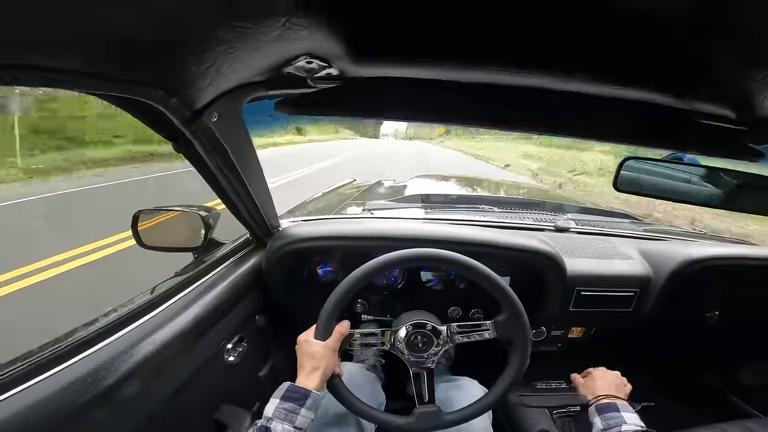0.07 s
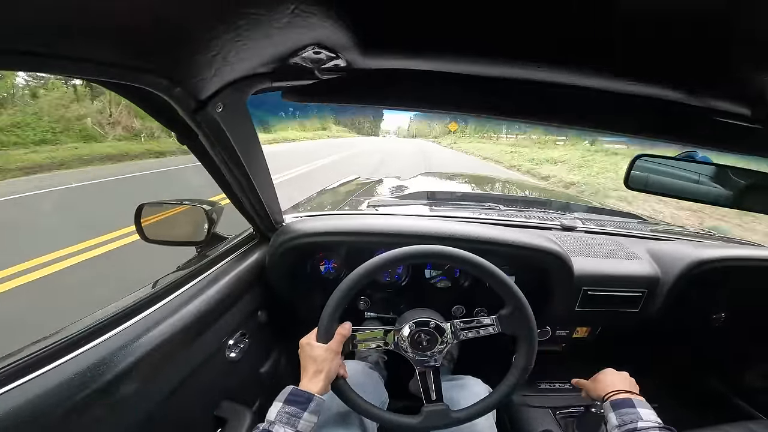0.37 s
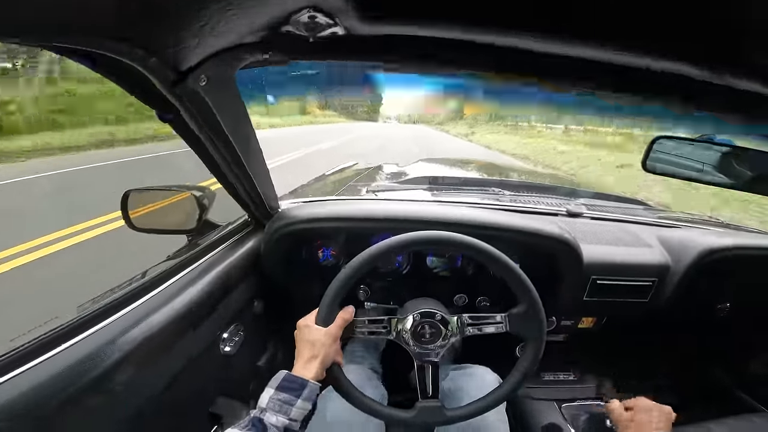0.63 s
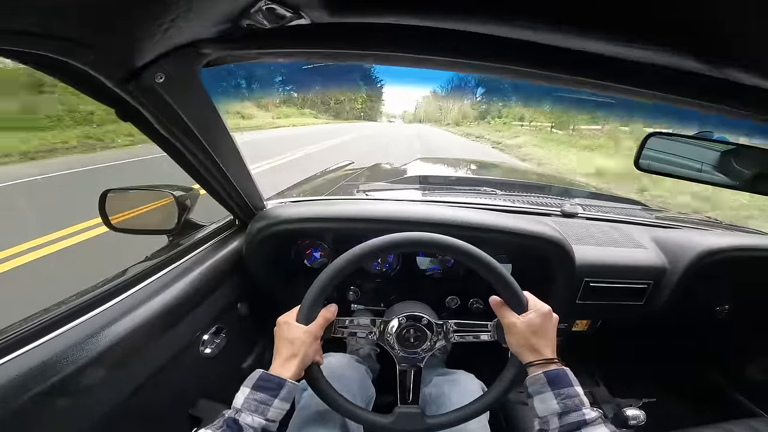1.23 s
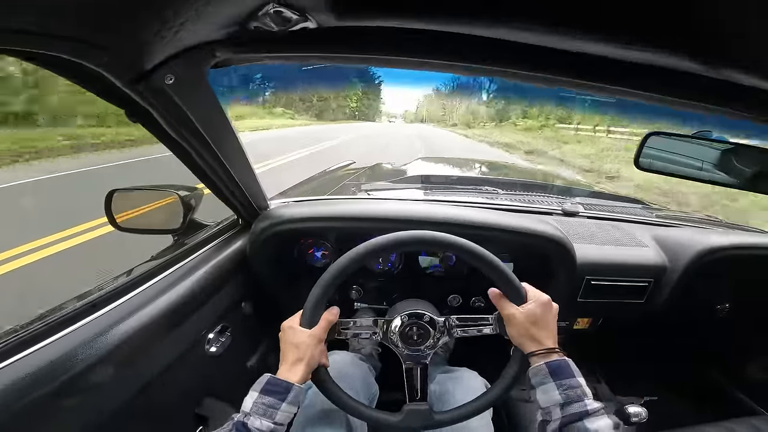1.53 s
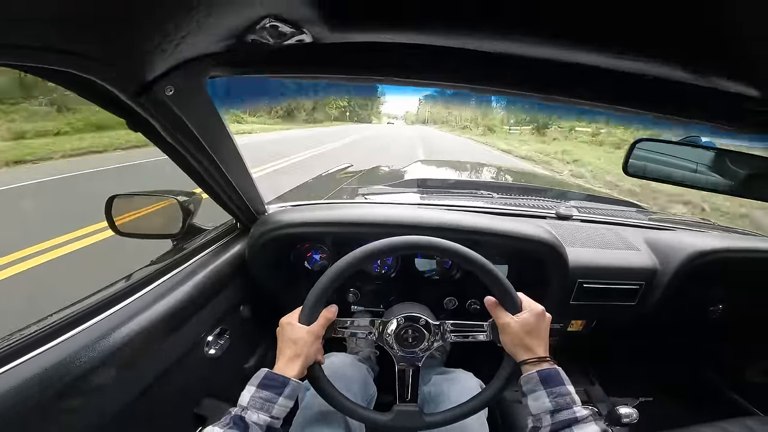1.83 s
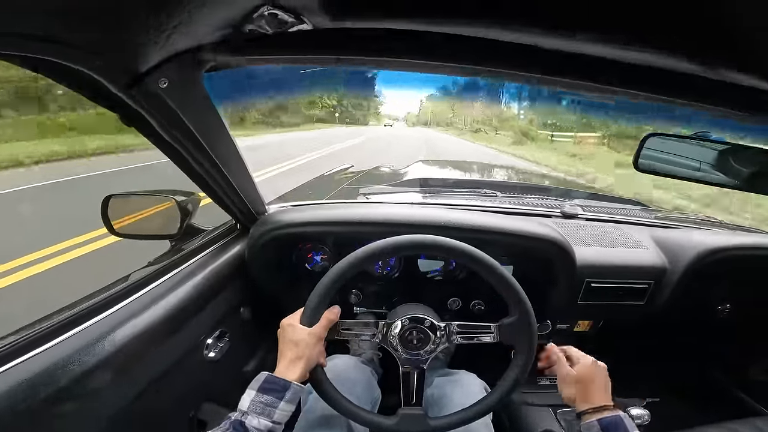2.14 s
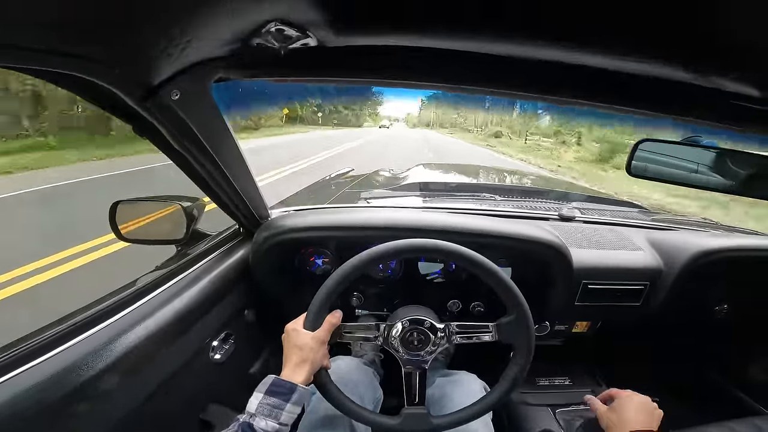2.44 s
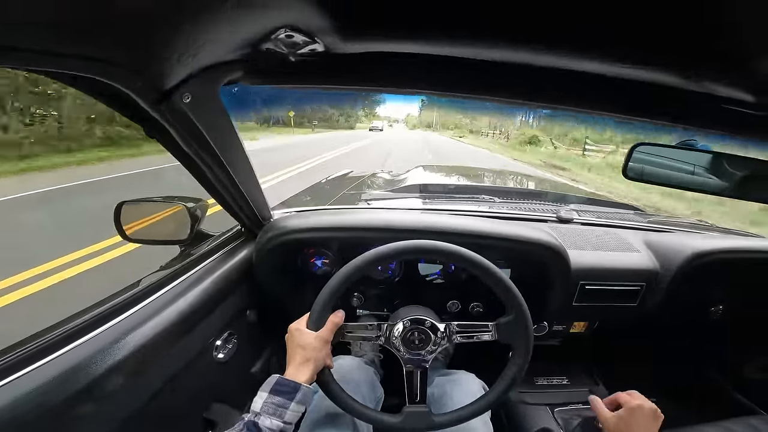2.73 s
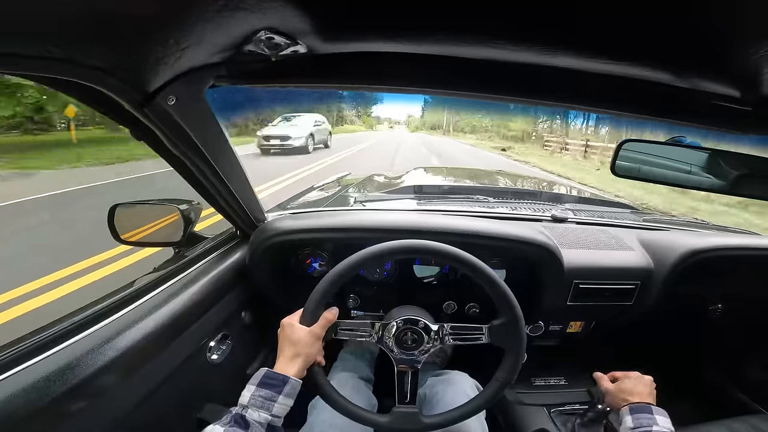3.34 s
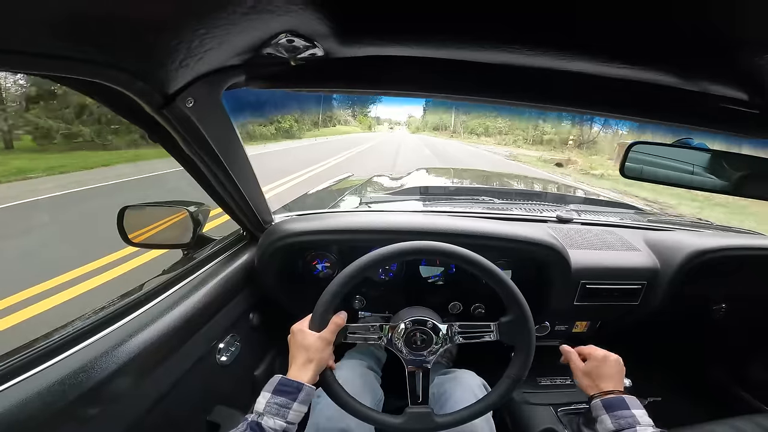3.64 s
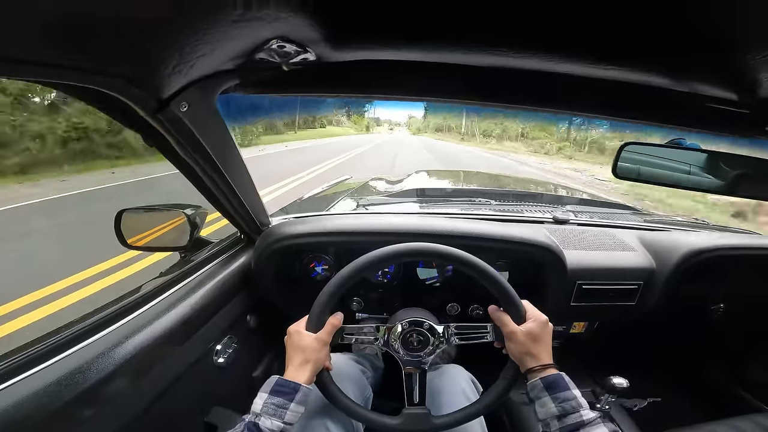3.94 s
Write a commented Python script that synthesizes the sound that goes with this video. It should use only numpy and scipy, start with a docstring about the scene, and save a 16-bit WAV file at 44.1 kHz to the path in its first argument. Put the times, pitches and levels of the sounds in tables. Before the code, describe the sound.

Loud car engine from the cabin, accelerating, shifting, then easing off over road rumble.

```python
"""Inside an old V8 coupe on an open road. The engine roars at full throttle, drops through a gear change,
pulls again, settles to a cruise and finally runs down off the throttle, setting the cabin booming.
Its note is a stack of orders, multiples of the four-stroke cycle rate, fluttering with uneven combustion;
the firings puff out rasp and hiss and shake pipes and metal. A few short bright clacks cut through.
Tyres rumble, wind hisses and the drive line whines underneath; an oncoming car brushes past."""
import sys
import numpy as np
from scipy import signal
from scipy.fft import rfft, irfft
from scipy.io import wavfile

SR = 44100
rng = np.random.default_rng(int(sys.argv[2]) if len(sys.argv) > 2 else 0)


def log_audio(samples):
    """Write samples as a 16-bit WAV file to the path given in sys.argv[1]."""
    # one column per channel
    frames = np.atleast_2d(samples).T
    # limit to full scale, then quantise
    limited = np.clip(frames, -1, 1)
    pcm = np.round(limited * 32767).astype(np.int16)
    wavfile.write(sys.argv[1], SR, pcm)


N = 176400
TIME = np.arange(N) / SR

# Fader for the full-throttle roar and growl. Each row: time in seconds, level in dB.
ROAR_FADER = [(0, -19.5), (.2, -20.5), (.43, -18), (.5, -24), (.56, -33), (.63, -66)]
# Fader for the mechanical singing and the thin tone beside it. Each row: time in seconds, level in dB.
SINGING_FADER = [(1.1, -46), (1.3, -36), (1.7, -38.5), (2.2, -37), (3.101, -37.5), (3.4, -41)]


def from_db(db):
    """Decibels to gain."""
    return 10 ** (np.asarray(db) / 20)


def rms_one(x):
    """Scale to unit power."""
    return x / np.sqrt(np.mean(x ** 2) + 1e-20)


def in_time(rows):
    """A control curve at every sample."""
    return np.interp(TIME, *np.transpose(rows))


def at_hz(points, hz):
    """Read a spectrum on a log-frequency axis."""
    f, db = np.transpose(points)
    return np.interp(np.log(hz + 1e-3), np.log(f), db)


def drift(rate_hz):
    """Slow random motion of spread 1."""
    hop, warm_up = 40, 2000
    r = np.exp(-2 * np.pi * hop * rate_hz / SR)
    white = rng.standard_normal(N // hop + warm_up + 2)
    slow = signal.lfilter([1], [1, -2 * r, r * r], white)[warm_up:]
    return np.interp(np.arange(N) / hop, np.arange(len(slow)), rms_one(slow))


def coloured(x, colour):
    """Give a steady sound a spectrum; unit power."""
    hz = np.arange(N // 2 + 1) * SR / N
    return rms_one(irfft(rfft(x) * from_db(at_hz(colour, hz)), N))


def noise(colour):
    """Steady noise with a spectrum."""
    return coloured(rng.standard_normal(N), colour)


def tyres():
    """Tyres rolling on the road lay down a bed of rumble."""
    # Swell of the rumble. Each row: time in seconds, level in dB.
    fader = [(0, -23), (.6, -20), (1.1, -23), (1.8, -22.5), (2.4, -22.5), (3.2, -20), (4, -23)]
    # Its dark tone. Each row: frequency in Hz, relative level in dB.
    colour = [(20, -12), (35, -9), (60, -3), (85, -7), (115, 1), (160, 8.5), (210, 2), (400, 1.5),
              (600, -4), (850, -12), (1200, -21.5), (2500, -65.5)]
    return from_db(in_time(fader)) * noise(colour)


def wind():
    """Air rushes round the windows, wavering slightly."""
    # Tone of the rush. Each row: frequency in Hz, relative level in dB.
    colour = [(500, -0.5), (900, 2.5), (1300, 1.5), (1800, -1), (2600, -5), (3400, -10), (4700, -9),
              (6000, -16.5), (7700, -24), (9000, -39.5), (10800, -31), (12200, -34.5), (14000, -42.5)]
    return from_db(-33 + 1.2 * drift(9.2)) * noise(colour)


def driveline_whine(hz=558.6):
    """The drive line holds one wavering pitch, loudest at the cruise."""
    # Swell of the whine. Each row: time in seconds, relative level in dB.
    fader = [(0, -10), (1.2, -2.5), (1.4, -11.5), (1.94, -10), (2.08, 4), (2.62, 5.5), (3, -6), (4, -7.5)]
    level = from_db(-28 + in_time(fader) + drift(11))
    return level * np.sqrt(2) * np.sin(2 * np.pi * hz * TIME + 0.71 * drift(6.4))


def oncoming_car(nearest_s=3.33, half_width_s=0.13):
    """A swish swells and fades as the other car goes by."""
    # Tone of the swish. Each row: frequency in Hz, relative level in dB.
    colour = [(400, -0.5), (1200, 1.5), (2500, -2), (4500, -1.5), (7500, -16.5), (11000, -40)]
    swell = from_db(-35.5) / (1 + ((TIME - nearest_s) / half_width_s) ** 2)
    return swell * noise(colour)


def thin_tone(hz=1159):
    """A faint high tone swells with the mechanical singing."""
    level = from_db(in_time(SINGING_FADER) - 4)
    return level * np.sqrt(2) * np.sin(2 * np.pi * hz * TIME + drift(4))


def clacks(decay_s=0.0059):
    """Short bright clacks: rattles under load, a crack as the throttle lifts, a clack at the gear change."""
    # The hits. Each row: start in seconds, peak level in dB.
    hits = [(.383, -31), (.497, -30), (.621, -33), (1.481, -35), (1.618, -35), (1.654, -30)]
    # Their bright tone. Each row: frequency in Hz, relative level in dB.
    colour = [(600, -20), (2800, 4), (11000, -17.5), (15000, -28)]
    envelope = sum(from_db(db) * (TIME > s) * np.exp(-np.abs(TIME - s) / decay_s) for s, db in hits)
    return envelope * noise(colour)


def firing_puffs(cycles, depth=0.2, uneven_db=1.5):
    """An envelope with one puff of gas per firing, each cylinder with its own strength."""
    # Punch of the cylinders in firing order. Each entry: relative level in dB.
    cylinders_db = [2, -2, 1, -3, 2, -1, -3, 0]
    firings = len(cylinders_db) * cycles
    cylinder = firings.astype(int) % len(cylinders_db)
    strength = from_db(np.array(cylinders_db)[cylinder] + uneven_db * drift(90))
    return rms_one(1 - depth + 2 * depth * strength * np.sin(np.pi * firings) ** 2)


def resonance(cycles, hz, width_hz):
    """The firings shake a narrow resonance; unit power."""
    r = np.exp(-np.pi * width_hz / SR)
    shake = rng.standard_normal(N) * firing_puffs(cycles)
    return rms_one(signal.lfilter([1, 0, -1], [1, -2 * r * np.cos(2 * np.pi * hz / SR), r * r], shake))


def intake_hiss(cycles):
    """The intake hisses under load, pulsing with the firings."""
    # Swell of the hiss. Each row: time in seconds, level in dB.
    fader = [(0, -36.5), (.25, -37.5), (.44, -36), (.53, -57), (.63, -52), (.8, -68), (1.2, -71.5),
             (1.45, -46.5), (1.65, -51.5), (1.9, -67)]
    # Its airy tone. Each row: frequency in Hz, relative level in dB.
    colour = [(3000, 1.5), (6000, 5), (8000, 5.5), (10300, 5), (12500, -4), (15500, -8.5)]
    return from_db(in_time(fader) + drift(26)) * noise(colour) * firing_puffs(cycles)


def bonnet_ring(cycles):
    """Metal under the bonnet rings at full throttle."""
    # Swell of the ring. Each row: time in seconds, level in dB.
    fader = [(0, -40), (.24, -26), (.48, -36), (.56, -56), (1.5, -46), (2.1, -54)]
    return from_db(in_time(fader)) * resonance(cycles, hz=2135, width_hz=36)


def pipe_growl(cycles):
    """The pipes resonate along with the roar."""
    # Pipe resonances. Each row: frequency in Hz, width in Hz, offset from the roar fader in dB.
    pipes = [(375, 21, -12.5), (704, 32, -9.5)]
    roar_db = in_time(ROAR_FADER)
    return sum(from_db(roar_db + db) * resonance(cycles, hz, width) for hz, width, db in pipes)


def rasp(cycles, points_per_cycle=300, clatter_band_hz=(930, 3950)):
    """Mechanical clatter that repeats every cycle, with noise puffed out by the firings."""
    # Swell of the rasp. Each row: time in seconds, level in dB.
    fader = [(0, -20), (.25, -18.5), (.46, -20), (.51, -27.5), (.8, -38), (1.1, -54), (1.3, -33.5),
             (1.48, -27), (1.75, -32.5), (2, -35.5), (3.15, -36.5), (3.5, -36), (4, -48)]
    # Its midrange bite. Each row: frequency in Hz, relative level in dB.
    colour = [(500, -11.5), (720, 10.5), (900, 2), (1130, 2.5), (1450, 1), (1950, -6), (2150, -3),
              (2500, -2), (2900, -4), (3300, -9), (3850, -5), (6000, -13.5), (9000, -30), (15000, -44)]
    pattern = signal.resample(rng.standard_normal(points_per_cycle), 8 * points_per_cycle)
    looped = np.interp(cycles, np.arange(len(pattern)) / len(pattern), pattern, period=1)
    band = signal.butter(4, clatter_band_hz, "band", fs=SR, output="sos")
    clatter = signal.sosfilt(band, coloured(looped, colour))
    puffs = coloured(rng.standard_normal(N) * firing_puffs(cycles), colour)
    return from_db(in_time(fader)) * (from_db(-1) * clatter + from_db(-3) * puffs)


def engine_orders(cycles, count):
    """For each multiple of the cycle rate, a clean line and a fluttering one from uneven combustion."""
    clean, ragged = [], []
    for k in range(1, count + 1):
        angle = 2 * np.pi * (k * cycles + rng.random())
        sine = np.sin(angle)
        clean.append(np.sqrt(2) * sine)
        ragged.append(drift(13) * sine + drift(7.2) * np.cos(angle))
    return np.array(clean), np.array(ragged)


def order_stack(orders, voicing, fader, flutter):
    """A set of engine orders under one fader."""
    clean, ragged = orders
    note = sum(from_db(db) * (clean[k - 1] + flutter * ragged[k - 1]) for k, db in voicing)
    return from_db(in_time(fader)) * note


def singing(orders):
    """High orders give a thin mechanical singing at steady speed."""
    # The singing lines. Each row: order, relative level in dB.
    voicing = [(32, -4.5), (33, -12), (48, -9.5)]
    return order_stack(orders, voicing, SINGING_FADER, flutter=0.44)


def cabin_boom(orders, cycle_hz, boom_hz=156.5, width_hz=10, count=8):
    """The air in the cabin resonates with the nearest low order."""
    # Swell of the boom. Each row: time in seconds, level in dB.
    fader = [(0, -33), (.48, -27), (.58, -16), (.7, -45), (.84, -21), (.93, -17), (1.04, -16),
             (1.16, -22.5), (1.3, -43.5), (3.1, -30), (3.25, -23), (3.5, -25), (3.7, -22), (3.81, -25.5),
             (3.89, -12), (4, -10.5)]
    # Its raggedness. Each row: time in seconds, gain of the flutter.
    flutter = [(1.1, .1), (3.2, .3), (3.75, .25), (3.85, .05)]
    clean, ragged = orders
    order_hz = np.arange(1, count + 1)[:, None] * cycle_hz
    gains = 1 / (1 + (2 * (order_hz - boom_hz) / width_hz) ** 2) ** 2
    gains = gains / np.sqrt((gains ** 2).sum(axis=0))
    lines = clean[:count] + in_time(flutter) * ragged[:count]
    return from_db(in_time(fader)) * (gains * lines).sum(axis=0)


def burble(orders, cycle_hz, fader, colour, flutter, count, lumpy_db=1.5):
    """Ragged orders slide through the fixed resonances of pipes and cabin, swinging in level."""
    clean, ragged = orders
    order_hz = np.arange(1, count + 1)[:, None] * cycle_hz
    gains = from_db(at_hz(colour, order_hz))
    gains = gains / np.sqrt((gains ** 2).sum(axis=0) * (1 + flutter ** 2))
    note = (gains * (clean[:count] + flutter * ragged[:count])).sum(axis=0)
    return from_db(in_time(fader) + lumpy_db * drift(25)) * note


def overrun(orders, cycle_hz):
    """Throttle shut: the engine burbles through the gear change, and again as it coasts."""
    # Swell of each burble. Each row: time in seconds, level in dB.
    shift_fader = [(.45, -21.5), (.56, -19.5), (.72, -18.5), (.93, -20.5), (1.12, -28), (1.3, -48)]
    coast_fader = [(3.08, -36.5), (3.24, -19), (3.58, -14.5), (3.78, -23), (3.86, -31), (4, -23)]
    # Pipe and cabin resonances for each. Each row: frequency in Hz, relative level in dB.
    shift_colour = [(60, -18), (120, -2.5), (200, -17), (248, 7), (280, -3), (310, 7.5), (345, -4),
                    (380, 8.5), (420, -0.5), (465, 2.5), (530, -11.5), (600, 4.5), (680, -25), (900, -23.5)]
    coast_colour = [(60, -15.5), (105, -9), (133, 12), (190, -4.5), (230, -13.5), (292, 10.5), (340, -7),
                    (385, -3.5), (455, 0.5), (515, -25), (575, -9), (680, -29.5), (900, -23)]
    return (burble(orders, cycle_hz, shift_fader, shift_colour, flutter=0.3, count=24)
            + burble(orders, cycle_hz, coast_fader, coast_colour, flutter=0.5, count=28))


def exhaust(orders):
    """Throttle open: the exhaust note blends between roar, pull and cruise."""
    # Voicing of each throttle state. Each row: order, relative level in dB.
    roar = [(2, -14.5), (3, -2.5), (4, -17), (5, -25.5), (6, -11), (7, -5), (8, -1.5), (9, -19), (10, -12),
            (11, -18.5), (12, -12.5), (13, -17), (14, -7.5), (15, -4.5), (16, -11), (18, -25)]
    pull = [(3, -13.5), (4, -23), (5, -13), (6, -20.5), (7, -22), (8, 0), (9, -13), (10, -18.5), (11, -24),
            (12, -11.5), (13, -16.5), (14, -25), (15, -14), (16, -22.5), (17, -16.5), (18, -25.5),
            (20, -22.5), (22, -21), (23, -23.5)]
    cruise = [(1, -25.5), (2, -24.5), (3, -18), (4, -15.5), (5, -3.5), (6, -7.5), (7, -15), (8, -13),
              (9, -9.5), (10, -16), (11, -6), (12, -8), (13, -4), (14, -16.5), (15, -18), (16, 1.5),
              (17, -17.5), (18, -23), (19, -23), (20, -26), (21, -17.5)]
    # Swells of the pull and the cruise. Each row: time in seconds, level in dB.
    pull_fader = [(1.1, -36), (1.25, -16.5), (1.5, -14.5), (1.7, -13), (1.88, -15), (2.03, -30), (2.6, -59),
                  (2.8, -20.5), (3.05, -19), (3.25, -36.5), (3.4, -49)]
    cruise_fader = [(1.05, -61.5), (1.2, -32), (1.5, -36), (1.95, -27.5), (2.04, -24), (2.5, -20.5),
                    (2.9, -24), (3.18, -26.5), (3.3, -31.5), (3.6, -69)]
    return (order_stack(orders, roar, ROAR_FADER, flutter=0.36)
            + order_stack(orders, pull, pull_fader, flutter=0.25)
            + order_stack(orders, cruise, cruise_fader, flutter=0.35))


def engine(lope_db=1.5, lope_peak_cycles=0.62):
    """All engine layers ride on one slightly unsteady crank speed."""
    # The revs. Each row: time in seconds, four-stroke cycles per second.
    revs = [(0, 43.6), (.12, 44.6), (.3, 47.2), (.42, 47.8), (.52, 47.4), (.61, 42.2), (.69, 41.9),
            (.8, 39.5), (.9, 37.4), (1.04, 35.4), (1.24, 36.7), (1.5, 36.7), (1.75, 37.0), (2.3, 36.8),
            (3.18, 37.05), (3.35, 35.2), (3.55, 32.4), (3.85, 27.0), (4, 26.4)]
    cycle_hz = in_time(revs) * (1 + 0.00197 * drift(14.3))
    cycles = np.cumsum(cycle_hz) / SR
    orders = engine_orders(cycles, count=48)
    hiss = intake_hiss(cycles)
    note = exhaust(orders) + singing(orders) + overrun(orders, cycle_hz) + cabin_boom(orders, cycle_hz)
    grit = hiss + pipe_growl(cycles) + bonnet_ring(cycles) + rasp(cycles)
    lope = from_db(lope_db * np.cos(2 * np.pi * (cycles - lope_peak_cycles)))  # one swell a cycle
    return note + lope * grit


def scene():
    """Engine and road at the driver's head, in mono."""
    return (engine() + tyres() + wind() + driveline_whine() + oncoming_car() + thin_tone() + clacks())[None]


def record(dry):
    """Peaks over full scale are clipped and the top is cut, 70 dB down from 16.7 kHz."""
    top_cut = signal.cheby2(12, 70, 16700, fs=SR, output="sos")
    return signal.sosfilt(top_cut, np.clip(dry, -1, 1))


dry = scene()
out = record(dry)
log_audio(out)
```